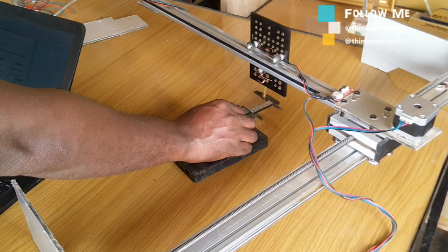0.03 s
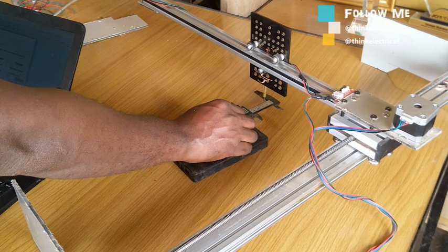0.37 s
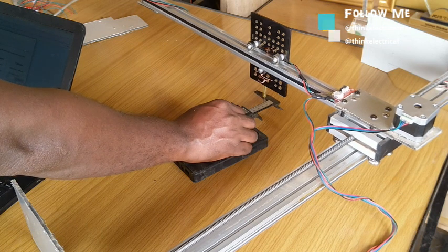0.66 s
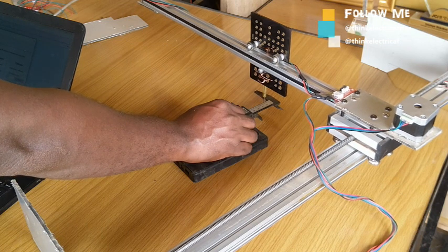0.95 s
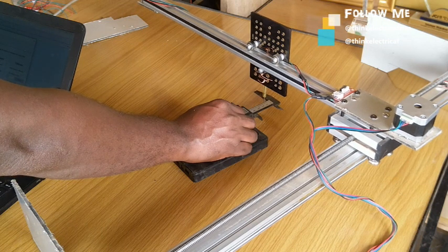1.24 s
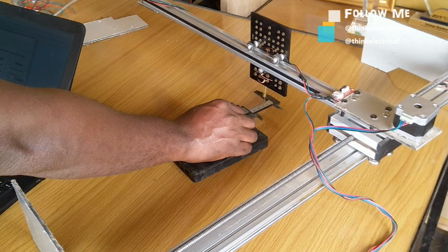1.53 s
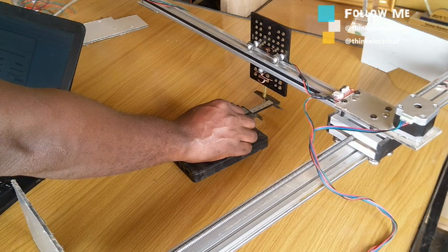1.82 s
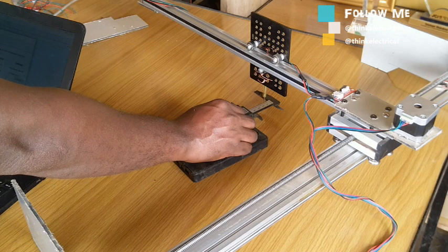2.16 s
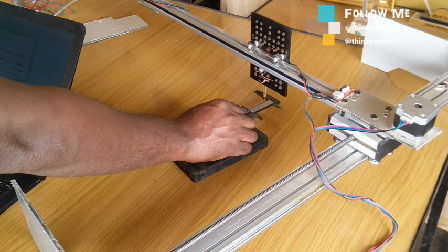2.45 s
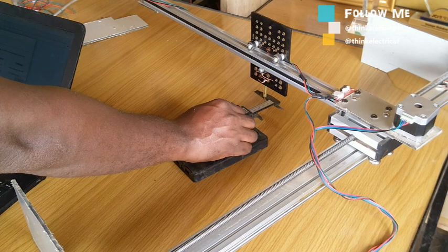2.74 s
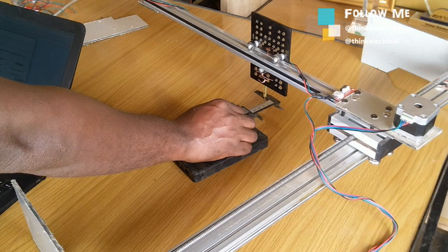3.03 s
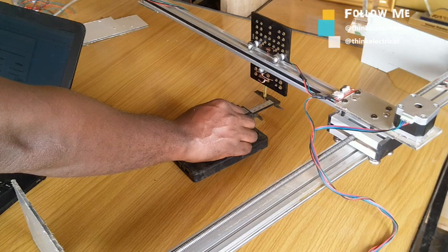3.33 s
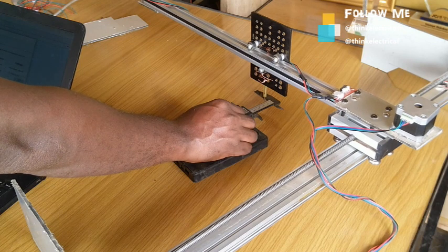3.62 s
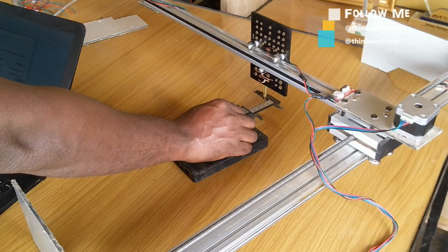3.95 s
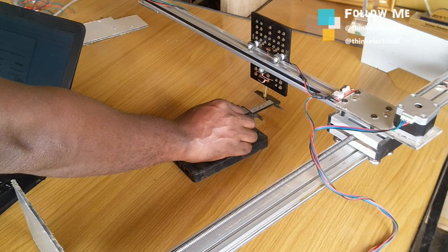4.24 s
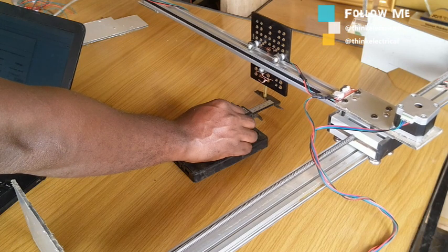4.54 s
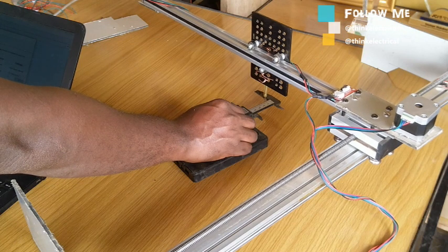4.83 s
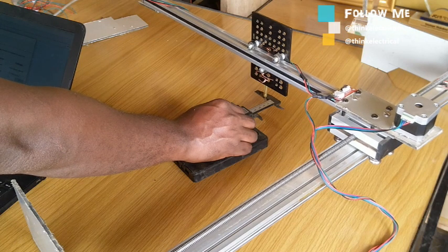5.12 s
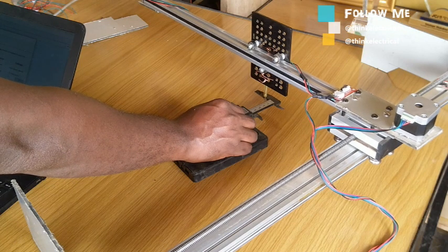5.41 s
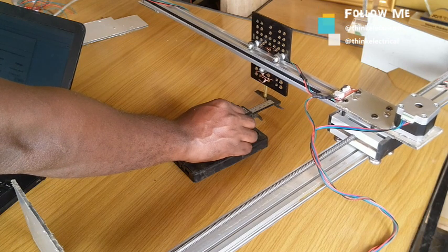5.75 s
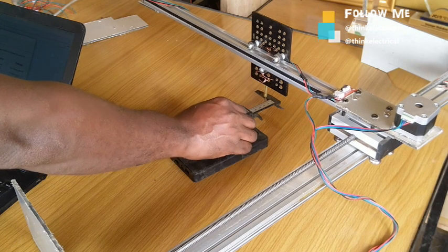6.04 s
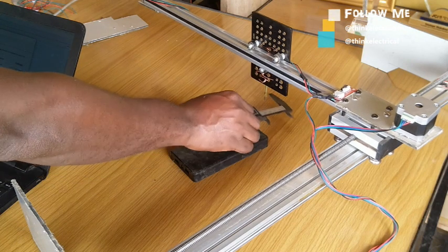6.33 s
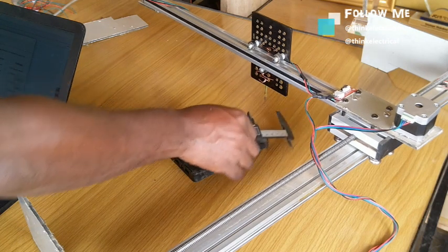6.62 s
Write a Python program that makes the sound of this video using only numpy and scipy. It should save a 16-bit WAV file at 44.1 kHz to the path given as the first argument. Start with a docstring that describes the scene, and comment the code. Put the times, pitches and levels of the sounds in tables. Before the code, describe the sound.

Close up on a wooden desk, a small engraving machine moves its axis three times. Each move is a short, buzzing metallic rattle that speeds up and slows down. A light button click comes just before the second and third moves. A cooling fan whines throughout, sagging slightly in pitch with each move, over faint room hiss and a thin electrical whistle.

```python
"""On a wooden desk, close up, a hobby engraving machine jogs its axis three times. The stepper ramps up and
down; each coarse step jerks the loose aluminium gantry into a short rattle. A cooling fan on the same supply
whines and sags in pitch with each move, over faint room hiss and a thin electrical whistle. A light button
click with a hollow ring precedes the second and third moves; there are also one faint hollow knock and one dull
bump on the desk."""
import sys
import numpy as np
from scipy import signal
from scipy.fft import rfft, irfft, next_fast_len
from scipy.io import wavfile

SR = 44100
rng = np.random.default_rng(int(sys.argv[2]) if len(sys.argv) > 2 else 0)


def to_wav(s):
    """Save 16-bit WAV."""
    ch = np.atleast_2d(s).T  # columns
    pcm = np.round(np.clip(ch, -1, 1) * 32767)  # PCM
    wavfile.write(sys.argv[1], SR, pcm.astype(np.int16))


N = 298557
TIME = np.arange(N) / SR


def gain(db):
    """dB to amplitude."""
    return 10 ** (np.asarray(db) / 20)


def lookup(table, hz):
    """Interpolate a table over log frequency."""
    f, value = np.transpose(table)
    return np.interp(np.log(hz + 1), np.log(f + 1), value)


def add(mix, start_s, sound):
    """Mix in at start_s, cropped to the buffer."""
    at = round(start_s * SR)
    sound = sound[max(-at, 0):]
    part = mix[max(at, 0):][:len(sound)]
    part += sound[:len(part)]


def equalise(x, curve, phase=((0, 0),)):
    """Filter by curve (f/Hz, gain/dB) and phase (f/Hz, angle/rad)."""
    size = next_fast_len(N + 4096)
    hz = np.fft.rfftfreq(size, 1 / SR)
    response = gain(lookup(curve, hz)) * np.exp(1j * lookup(phase, hz))
    return irfft(rfft(x, size) * response, size)[..., :N]


def ring(x, colour, modes=(), size=8192):
    """Minimum-phase body of unit energy: broad colour plus blunt peaks, each a cluster of modes."""
    hz = abs(np.fft.fftfreq(size, 1 / SR))
    peaks_db = sum(db / np.hypot(1, (2 * (hz - f) / width_hz) ** 2) for f, width_hz, db in modes)
    log_gain = np.log(gain(lookup(colour, hz) + peaks_db))
    spectrum = np.exp(np.conj(signal.hilbert(log_gain)))
    impulse = np.fft.ifft(spectrum).real[:size // 2]
    return signal.oaconvolve(x, impulse / np.linalg.norm(impulse))[:N]


def drift(rate_hz, hop=32):
    """Slow complex noise, rms 1, bandwidth rate_hz."""
    size = next_fast_len(N // hop + 2)
    hz = np.fft.fftfreq(size, hop / SR)
    coarse = np.fft.ifft(np.exp(2j * np.pi * rng.random(size)) / (1 + (hz / rate_hz) ** 2))
    noise = np.interp(np.arange(N) / hop, np.arange(size), coarse)
    return noise / np.sqrt(np.mean(abs(noise) ** 2))


# Room decay: f/Hz, T60/s
ROOM_T60 = [(200, 0.51), (600, 0.28), (1400, 0.19), (3700, 0.2), (10000, 0.12)]


def room(x, predelay_s, paths=3, shift_hz=5, taps_per_s=3000):
    """Sparse reflections dying band by band; the paths shift by a steady crossfade."""
    wet = np.zeros(N)
    for k in range(paths):
        taps = (rng.random(SR // 2) < taps_per_s / SR) * rng.choice([-1., 1.], SR // 2)
        taps[:int(predelay_s * SR)] = 0
        hz, t, bands = signal.stft(taps, SR, nperseg=256)
        decay = gain(-60 * t / lookup(ROOM_T60, hz)[:, None])
        tail = signal.istft(bands * decay, SR, nperseg=256)[1]
        share = np.sqrt(2 / paths) * np.cos(2 * np.pi * (shift_hz * TIME + k / paths))
        wet += signal.oaconvolve(x * share, tail / np.linalg.norm(tail))[:N]
    return wet


# Hiss spectrum: f/Hz, relative density/dB
AIR_COLOUR = [(15, -17), (35, -3), (70, -1), (170, -6), (330, -3.5), (450, -1), (720, 0.5), (900, -5.5),
              (1350, -6), (1750, -12.5), (3500, -18), (6200, -24), (8500, -36.5), (15500, -39.5)]
# Hiss stereo image: f/Hz, L-R correlation
AIR_CORRELATION = [(60, 0.99), (350, 0.95), (550, 0.93), (900, .65), (1300, .35), (1800, .05),
                   (2400, -0.16), (5000, 0.083), (15000, -0.63)]


def air(rms_db=-48.0):
    """Steady room hiss, alike in both ears only in the bass."""
    size = next_fast_len(N)
    hz = np.fft.rfftfreq(size, 1 / SR)
    left, independent = rfft(rng.standard_normal((2, size)))
    correlation = lookup(AIR_CORRELATION, hz)
    right = correlation * left + np.sqrt(1 - correlation ** 2) * independent
    hiss = irfft(np.array([left, right]) * gain(lookup(AIR_COLOUR, hz)))[:, :N]
    return gain(rms_db) * hiss / np.sqrt(np.mean(hiss ** 2))


def whistle(pitch_hz=2514, level_db=-65, right_phase_turns=0.6, waver=0.25):
    """Thin electrical whistle, near antiphase between the ears."""
    tone = np.exp(2j * np.pi * pitch_hz * TIME) * (1 + waver * drift(rate_hz=4))
    ears = np.array([tone, tone * np.exp(2j * np.pi * right_phase_turns)])
    return gain(level_db) * np.sqrt(2) * ears.real


def fan_pitch_hz(idle_hz=541.3, sag_hz=21.01, lag_s=0.55):
    """The fan shares the motor's supply: it slows during a jog, then recovers."""
    load = np.zeros(N)
    for start_s, count, _ in JOGS:
        step_s, _ = speed_ramp(count)
        load += (TIME > start_s) & (TIME < start_s + step_s[-1])
    pole = np.exp(-1 / (lag_s * SR))
    return idle_hz - sag_hz * signal.lfilter([1 - pole], [1, -pole], load)


# Whine envelope: t/s, relative level/dB
WHINE_ENVELOPE = [(0, -33.5), (0.65, -37), (1.05, -34.5), (1.45, -35.5), (1.6, -32), (2.25, -33),
                  (2.9, -36.5), (3.4, -35.6), (3.75, -35), (3.95, -32), (4.4, -34), (5.0, -36.5),
                  (5.55, -35.5), (5.95, -33.5), (6.4, -32.5), (6.77, -33.5)]
# Brief dips in the whine: t/s, gain/dB
WHINE_DROPS = [(0.786, -6), (3.055, -9), (3.845, -14), (4.08, -8), (4.16, -12), (5.36, -9), (6.265, -16)]
# Low hum and fuzzy tones around the whine: f/Hz, nominal width/Hz, level/dB
FAN_TONES = [(46.3, 8.9, -54.3), (384.5, 5.2, -58.5), (475.6, 16, -49.5), (506, 19, -54.5),
             (541, 30, -49.5), (616.7, 24, -47), (743, 21, -59.5), (781, 17, -50.5), (826, 25, -60),
             (1027, 10, -65.5), (1334, 30, -66.5), (1860, 20, -73.5), (2250, 10, -75.5)]


def fan(left_db=-0.5, right_db=-0.37, lag_turns=0.018, waver=0.29, dip_s=0.016, spread_db=-14):
    """Cooling fan: one strong wavering tone among weaker fuzzy ones."""
    level_db = np.interp(TIME, *np.transpose(WHINE_ENVELOPE))
    level_db += sum(db * np.exp(-((TIME - at_s) / dip_s) ** 2) for at_s, db in WHINE_DROPS)
    turns = np.cumsum(fan_pitch_hz()) / SR
    whine = gain(level_db) * np.exp(2j * np.pi * turns) * (1 + waver * drift(rate_hz=21))
    ears = np.array([whine * gain(left_db), whine * gain(right_db) * np.exp(-2j * np.pi * lag_turns)])
    for hz, width_hz, db in FAN_TONES:
        carrier = gain(db) * np.exp(2j * np.pi * hz * TIME)
        mid = drift(0.77 * width_hz)
        side = gain(spread_db) * hz / 500 * drift(0.7 * width_hz)  # low tones stay centred
        ears += carrier * np.array([mid + side, mid - side])
    return np.sqrt(2) * ears.real


# Button clicks: t/s, excitation level/dB
BUTTON_CLICKS = [(2.128, -43.5), (4.288, -46.5)]
# Button body: f/Hz, relative gain/dB
BUTTON_COLOUR = [(300, -21), (2500, -6), (3500, -6), (4400, 0), (5200, -8), (6000, -10), (8200, -21),
                 (10000, -7), (11300, -6), (12200, -13), (13400, -14), (14500, -32), (15500, -30)]
# Hollow rings of the two button clicks, then one faint knock: t/s, level before envelope/dB, f/Hz
HOLLOW_RINGS = [(2.128, -32, 970), (4.29, -36, 950), (6.264, -36, 982)]


def handling(click_s=0.0025, tap_s=0.0074, bump_at_s=1.3, bump_s=0.084, bump_hz=92, bump_db=-47):
    """Button clicks (noise bursts, each with a damped hollow ring), one faint hollow knock and one dull bump on
    the desk."""
    t = np.arange(SR // 8) / SR
    snaps, taps = np.zeros((2, N))
    for at_s, db in BUTTON_CLICKS:
        add(snaps, at_s, gain(db) * np.exp(-t / click_s) * rng.standard_normal(len(t)))
    tap_envelope = (1 - np.exp(-t / 0.0018)) * np.exp(-t / tap_s)
    for at_s, db, hz in HOLLOW_RINGS:
        add(taps, at_s, gain(db) * tap_envelope * np.sin(2 * np.pi * hz * t))
    direct = ring(snaps, BUTTON_COLOUR) + taps
    judder = np.cos(2 * np.pi * bump_hz * TIME + np.angle(drift(rate_hz=20)))
    bump = gain(bump_db) * judder * np.exp(-((TIME - bump_at_s) / bump_s) ** 2)
    reflections = np.array([room(direct, predelay_s=0.0045) for _ in range(2)])
    return direct + gain(-3.0) * reflections + bump


CRAWL_STEPS_PER_S, ACCEL_STEPS_PER_S2, BRAKE_STEPS_PER_S2 = 30.7, 245, 218


def speed_ramp(count):
    """One jog: crawl, even acceleration, even braking. Returns step times/s and speeds/(steps/s)."""
    done = np.arange(count) + 0.5
    speed = np.sqrt(2 * np.minimum(ACCEL_STEPS_PER_S2 * done, BRAKE_STEPS_PER_S2 * (count - done)))
    speed = np.maximum(speed, CRAWL_STEPS_PER_S)
    return np.cumsum(1 / speed) - 1 / speed, speed


# Axis jogs: start t/s, step count, base strength/dB
JOGS = [(-0.029, 25, -16), (2.295, 24, -15), (4.463, 25, -14.5)]


def stepper(db_per_octave=1.0, scatter_db=1.22, shake_at_s=0.286, shake_s=0.046, shake_db=2.5):
    """Jerks as (t/s, strength/dB). Faster steps hit harder; the gantry shakes most early in braking."""
    steps = []
    for start_s, count, base_db in JOGS:
        t, speed = speed_ramp(count)
        shake = np.exp(-((t - shake_at_s) / shake_s) ** 2)
        db = base_db + db_per_octave * np.log2(speed / CRAWL_STEPS_PER_S) + shake_db * shake
        steps += zip(start_s + t, db + scatter_db * rng.standard_normal(count))
    return steps


def contacts(steps, envelope, per_s):
    """Force of a clump of small metal contacts at each step."""
    force = np.zeros(N)
    for at_s, db in steps:
        hits = rng.random(len(envelope)) < per_s / SR
        clump = envelope * hits * rng.choice([-1., 1.], len(envelope))
        clump *= np.linalg.norm(envelope) / (np.linalg.norm(clump) + 1e-9)
        add(force, at_s, gain(db) * clump)
    return force


# Hard first slam of a step: f/Hz, gain/dB
SLAM_COLOUR = [(200, -2.5), (1000, -4), (1900, -1), (2500, -5.5), (3150, 7), (4400, 2.5), (5000, -7),
               (9000, -6.5), (15500, -4)]


def chatter(steps, slam_db, slam_s, bounce_db, bounce_s=0.022):
    """Each step slams loose parts together; they then bounce and settle."""
    t = np.arange(SR // 8) / SR
    slam = contacts(steps, (1 - np.exp(-t / 0.0006)) * np.exp(-(t / slam_s) ** 2), per_s=6000)
    bounces = contacts(steps, (1 - np.exp(-t / 0.0035)) * np.exp(-t / bounce_s), per_s=3500)
    return gain(slam_db) * equalise(slam, SLAM_COLOUR) + gain(bounce_db) * bounces


# Broad frame response: f/Hz, relative gain/dB
FRAME_COLOUR = [(90, -31.5), (140, -17.5), (190, -11), (320, -9), (450, -1), (750, -6), (1500, -3.5),
                (2600, -3.5), (4300, -3.5), (6900, -7.5), (7600, -15.5), (10500, -16), (12500, -25),
                (15600, -23.5)]
# Rail, plate and desk resonances: f/Hz, width/Hz, peak over broad response/dB
FRAME_RESONANCES = [(209, 34, 7.5), (235.2, 17, 6.5), (836, 32, 3.5), (978, 40, 7.5), (1047.3, 42.4, 17),
                    (1170, 30, 1.5), (1381, 54, 5), (1627, 58, 1.5), (1861, 79, 8), (1948, 56, 2.5),
                    (2118, 12, 8), (2176, 61, 5.5), (2394, 38, 6), (2690, 27, 5), (2870, 97, 6),
                    (3145, 61, 6.5), (3196, 120, 4.0), (3410, 160, 4.5), (3870, 270, 2.5), (4100, 100, 3),
                    (4283, 87, 6.5), (4470, 68, 6), (5300, 140, 3), (5520, 32, 7.5), (7030, 370, 3),
                    (7900, 34, 5.5), (11300, 71, 2.5), (12000, 113, 5)]
# Rattle width, centred bass to diffuse treble: f/Hz, side gain/dB
RATTLE_WIDTH = [(100, -32.5), (200, -33.5), (350, -16.5), (520, -13), (870, -5.5), (1050, -10),
                (1700, -8.5), (2100, -10.5), (2550, -4), (3150, -12.5), (4200, -15.5), (4500, -11),
                (4850, -1), (15500, -2)]
# Rattle balance: f/Hz, left minus right/dB
RATTLE_PAN = [(200, 0), (4900, 0), (5700, -2), (7000, -0.5), (8000, 2.5), (9600, -1.5), (11000, 1),
              (13500, 1), (15500, 8)]
# Frame parts radiate from different places: f/Hz, left-ear lead/rad
RATTLE_PHASE = [(850, 0), (1050, -0.1), (1250, -0.24), (1700, 1), (2050, 0.16), (2450, 0.8), (2900, -0.2),
                (3400, -.1), (4500, 0.1)]


def gantry():
    """Step chatter rings the frame; flanking parts and wall reflections add width."""
    steps = stepper()
    centre_force = chatter(steps, slam_db=-4.0, slam_s=0.0067, bounce_db=-2.5)
    flank_force = chatter(steps, slam_db=-5.0, slam_s=0.0051, bounce_db=-1.0)
    centre = ring(centre_force, FRAME_COLOUR, FRAME_RESONANCES)
    flank = ring(flank_force, FRAME_COLOUR, FRAME_RESONANCES)
    mid = gain(0.33) * centre + gain(-7.5) * room(centre, predelay_s=0.007)
    side = equalise(gain(-0.5) * flank + gain(-3.0) * room(flank, predelay_s=0.005), RATTLE_WIDTH)
    pan = np.array(RATTLE_PAN)
    left = equalise(mid + side, pan * [1, 0.5], RATTLE_PHASE)  # half the dB to each ear
    right = equalise(mid - side, pan * [1, -0.5])
    return np.array([left, right])


def scene():
    """Stereo sum of the machine and the small sounds around it."""
    return gantry() + fan() + whistle() + air() + handling()


def record(dry, ceiling=0.88, cutoff_hz=15900):
    """Soft peak clipping, then low-pass."""
    rounded = dry / (1 + (dry / ceiling) ** 4) ** (1 / 4)
    lowpass = signal.firwin(1023, cutoff_hz, window=("kaiser", 9), fs=SR)
    return signal.oaconvolve(rounded, lowpass[None], "same")


dry = scene()
out = record(dry)
to_wav(out)
```